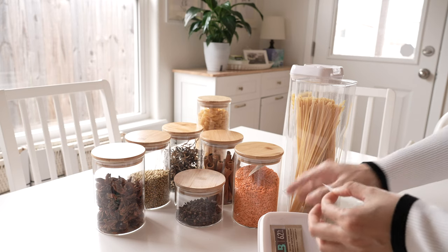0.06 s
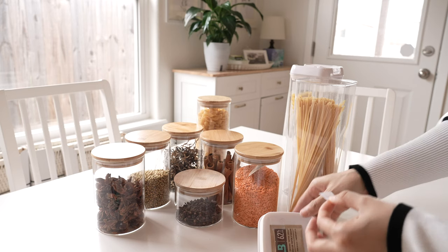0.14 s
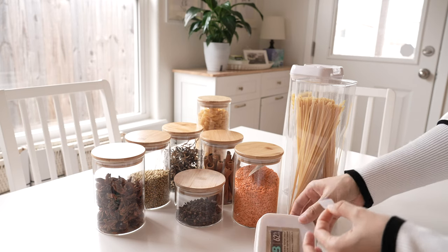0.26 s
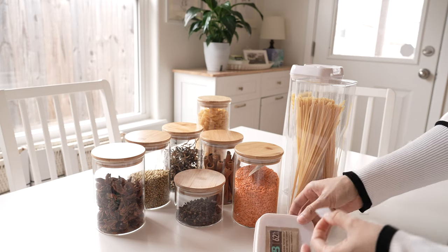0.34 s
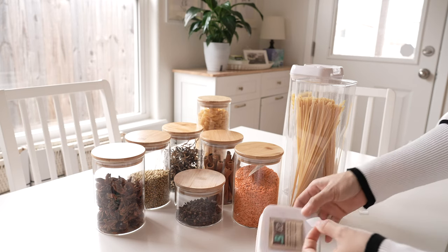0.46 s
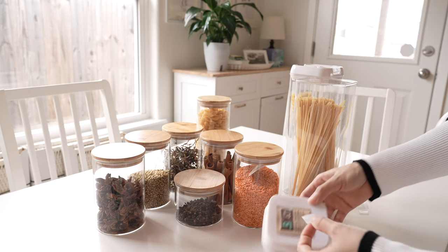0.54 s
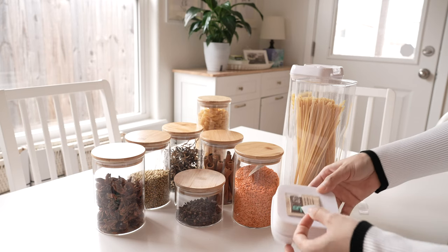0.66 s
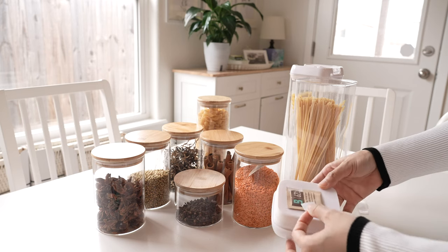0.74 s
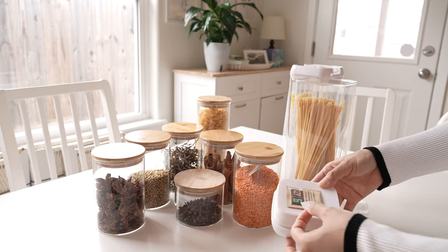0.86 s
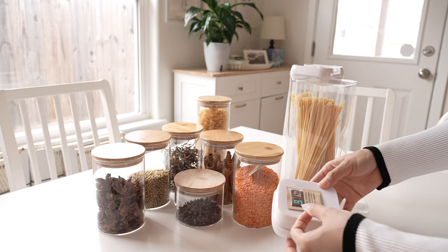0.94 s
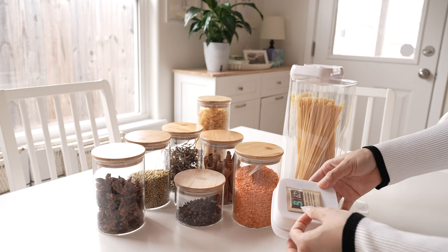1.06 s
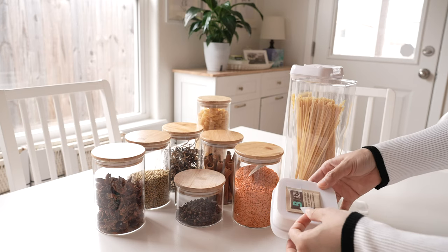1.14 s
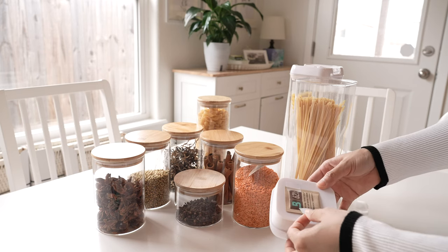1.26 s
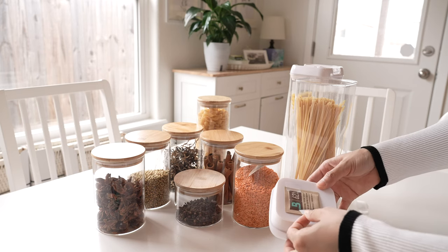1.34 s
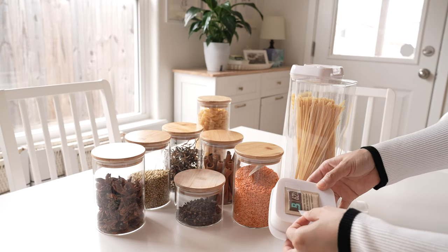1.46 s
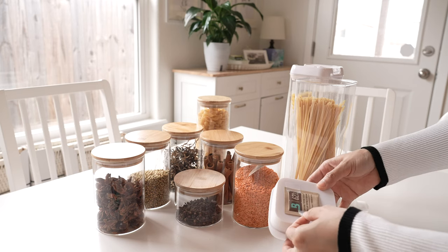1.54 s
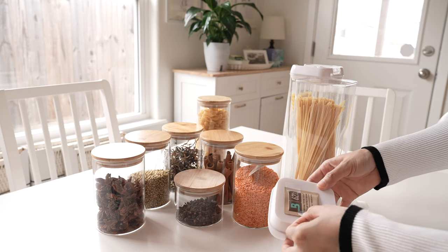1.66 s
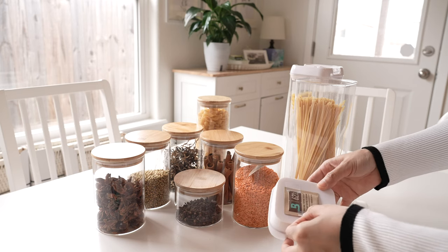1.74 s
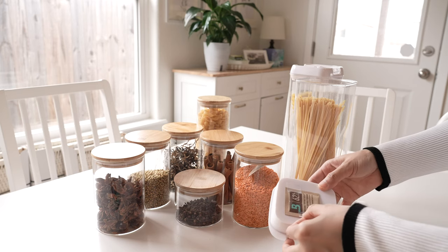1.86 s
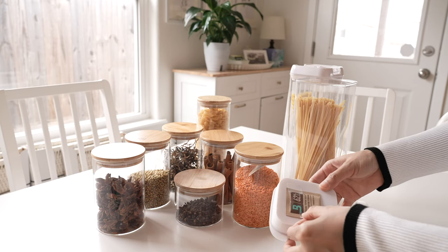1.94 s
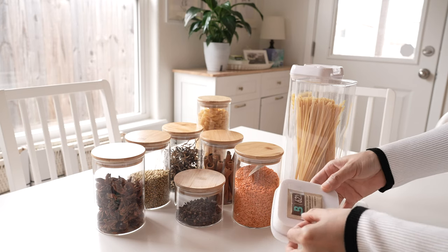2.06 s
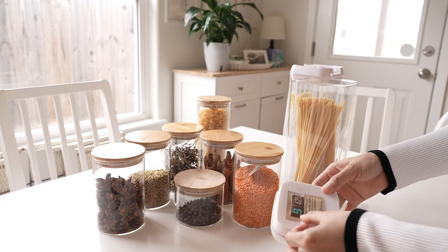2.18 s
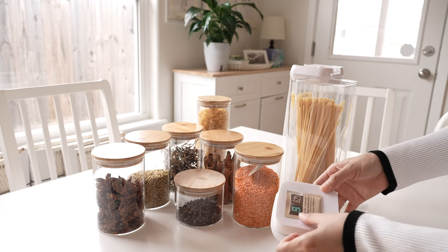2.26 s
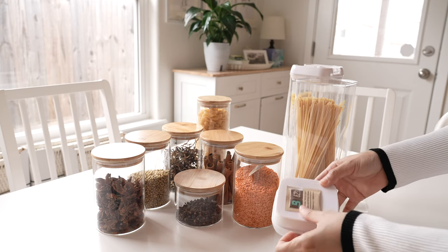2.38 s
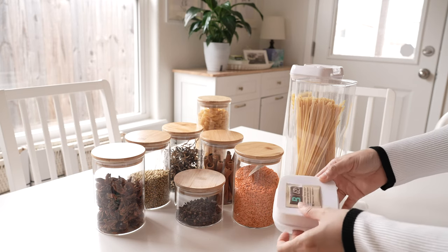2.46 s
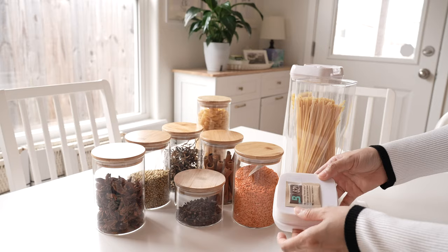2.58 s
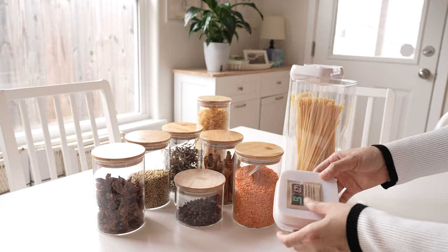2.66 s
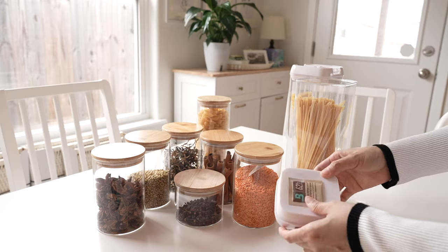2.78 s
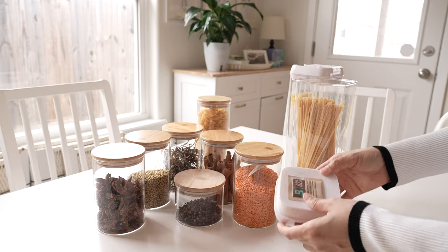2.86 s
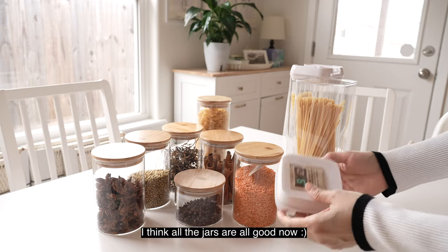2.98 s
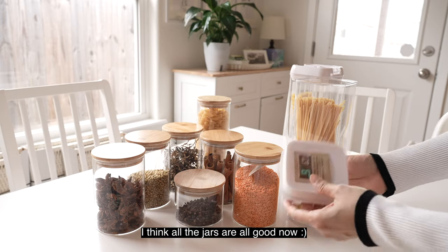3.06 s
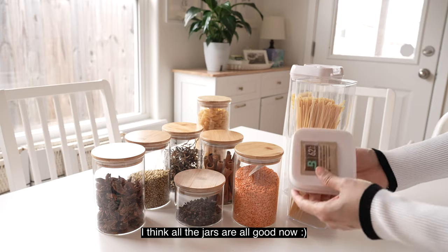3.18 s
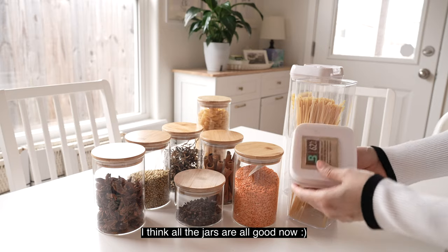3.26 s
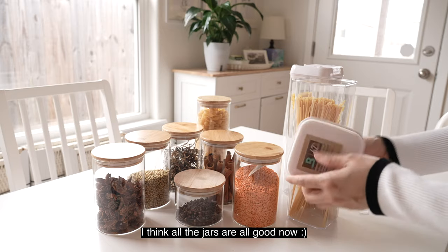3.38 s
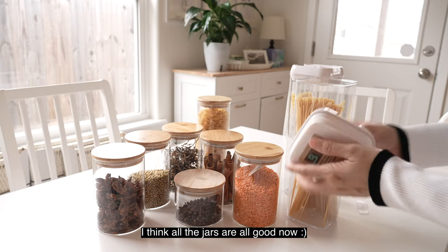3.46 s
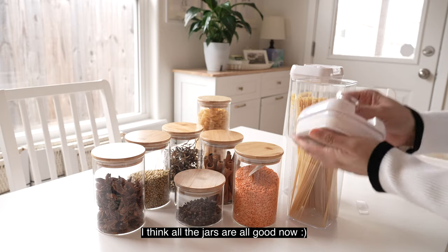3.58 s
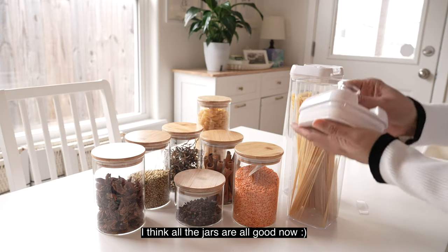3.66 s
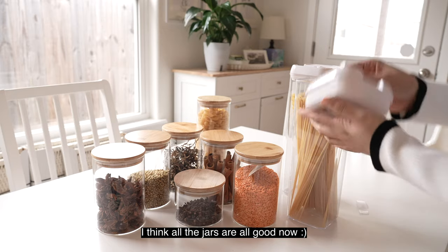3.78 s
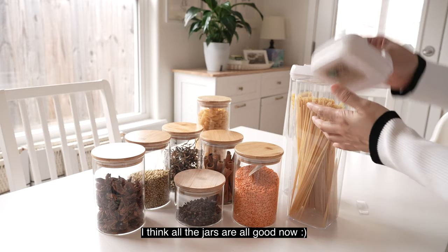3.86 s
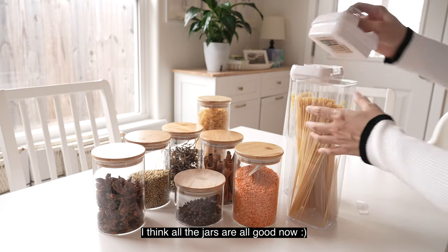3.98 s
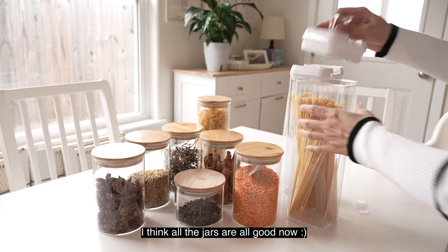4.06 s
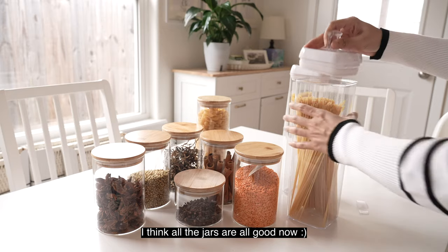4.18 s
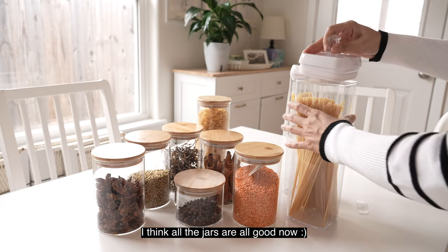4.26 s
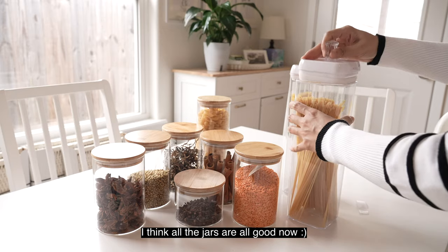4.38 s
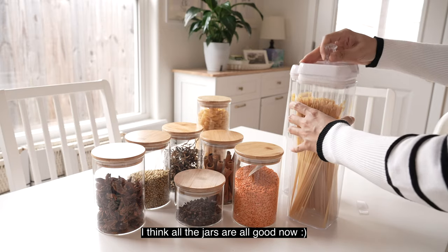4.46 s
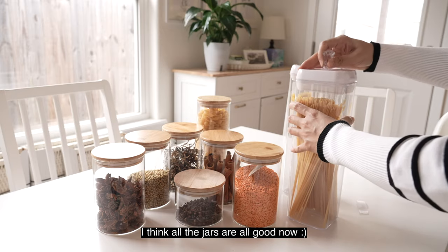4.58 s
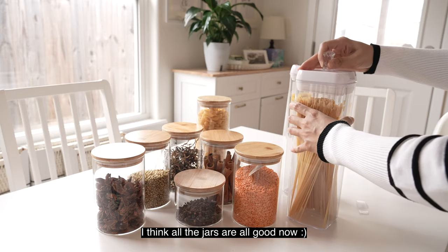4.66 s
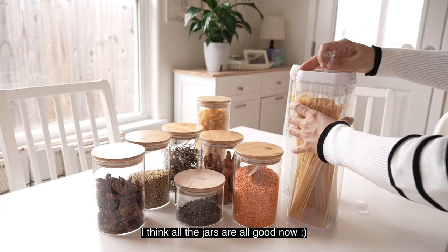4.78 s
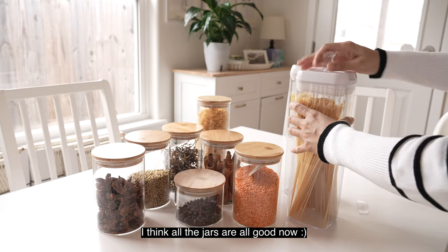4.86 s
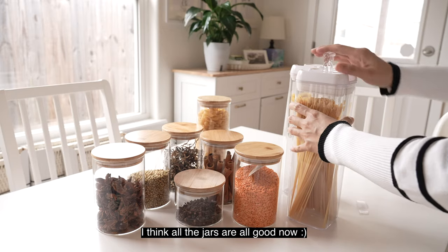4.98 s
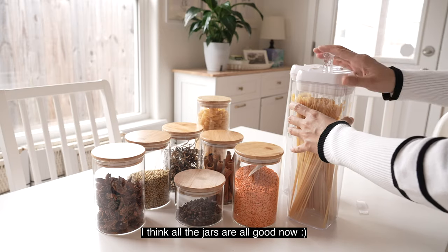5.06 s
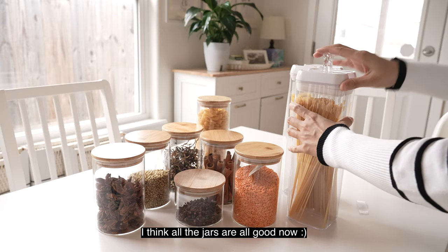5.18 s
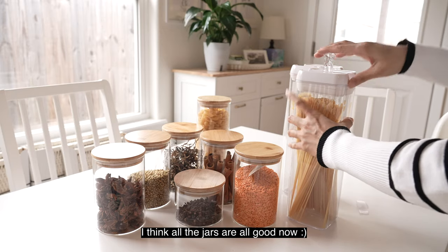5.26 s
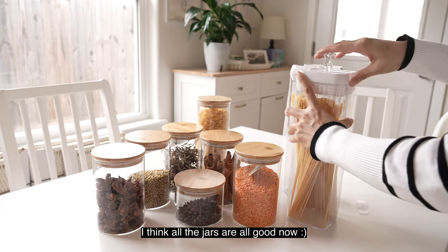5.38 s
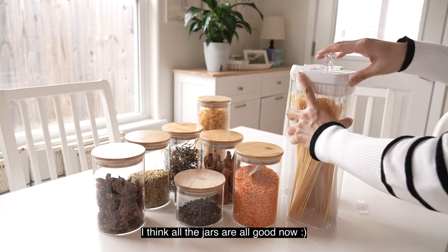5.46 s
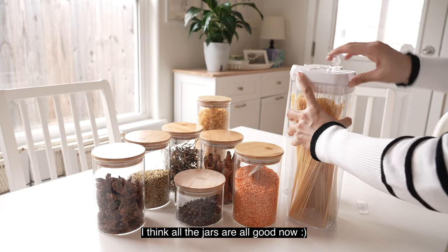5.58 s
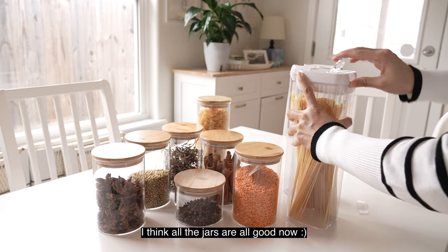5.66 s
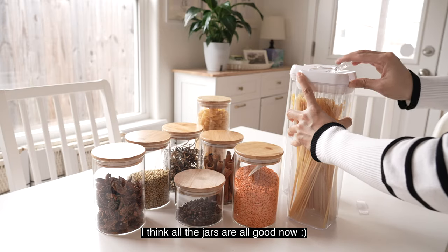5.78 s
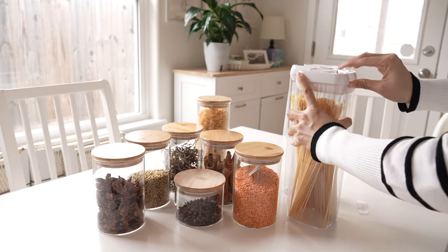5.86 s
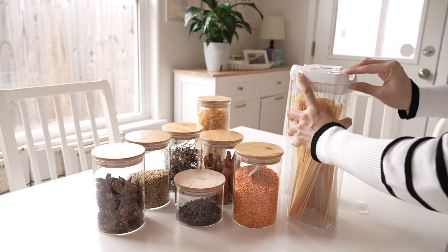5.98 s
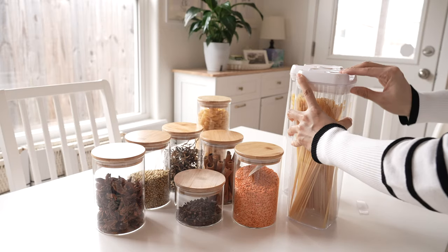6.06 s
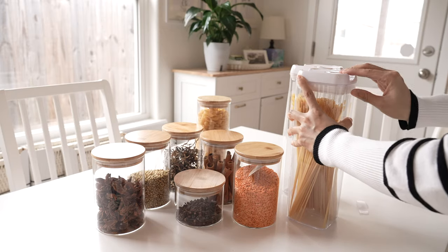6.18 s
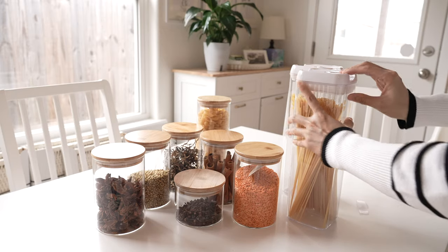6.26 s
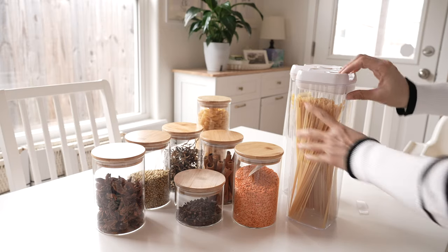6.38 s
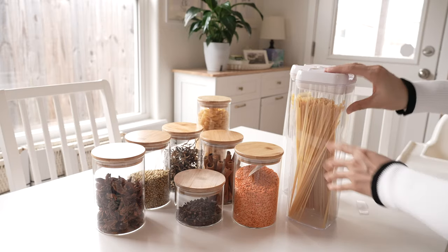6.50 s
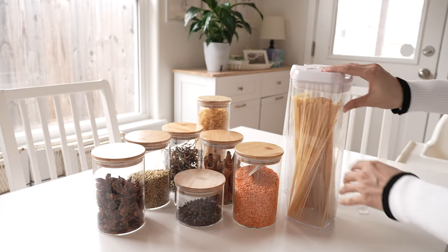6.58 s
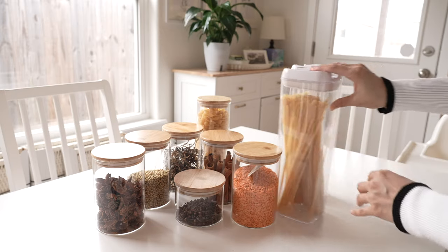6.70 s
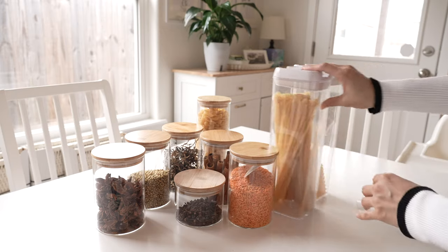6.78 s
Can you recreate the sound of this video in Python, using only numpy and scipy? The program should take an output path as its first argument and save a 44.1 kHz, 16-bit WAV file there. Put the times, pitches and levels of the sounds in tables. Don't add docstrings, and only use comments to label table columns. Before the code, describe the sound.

Hands tick at a plastic lid, knock it hollowly onto a tall pasta jar, snap its latch and slide the jar along a table.

```python
import sys
import numpy as np
from scipy import signal
from scipy.fft import rfft, irfft
from scipy.io import wavfile
from scipy.ndimage import uniform_filter1d

SR = 44100
rng = np.random.default_rng(int(sys.argv[2]) if len(sys.argv) > 2 else 0)


def persist_wave(psi):
    counts = np.round(np.clip(psi, -1, 1) * 32767).astype(np.int16)
    wavfile.write(sys.argv[1], SR, np.atleast_2d(counts).T)


def ratio_of_db(decibels):
    return 10 ** (np.asarray(decibels, float) / 20)


N = 301242

# f/Hz, level per Hz/dB
AIR_COLOUR = [(12, -46), (20, -8.5), (65, -1.5), (86, -12.5), (98, -13), (145, -20), (192, -14.5),
              (269, -14.5), (398, -18.5), (445, -18.5), (588, -17), (778, -24), (1060, -24), (1700, -32),
              (15700, -53), (15900, -80)]
# f/Hz, level/dB, width/Hz, steady share/0-1
FRIDGE_TONES = [(58, -52, 22, 0.5), (71.54, -51, 6, 0.04), (197.5, -56, 10.4, 0.64), (238.4, -61, 23, 0.39),
                (386, -67, 8.5, 0.1), (588, -63.5, 21, 0.52), (815, -70.5, 18, 0.7), (975, -72, 5.2, 0.47),
                (1050, -61.5, 11, 0.81), (2540, -79, 6, 1), (2680, -79.5, 2.4, 0.4), (4100, -79.5, 230, 0),
                (5760, -86, 28, 0.1)]
# peak t/s, rise/s, fall/s, level/dB, sizzle above 6 kHz against it/dB
FINGER_RUBS = [(0.004, 0.0071, 0.16, -72, 15), (0.632, .05, 0.13, -57, -3.5),
               (1.968, 0.2, 0.12, -76.5, 13.5), (2.048, .02, .05, -67, -10), (2.57, 0.18, 0.065, -52, -1),
               (2.654, 0.039, 0.035, -52.5, -1.5), (2.842, 0.045, 0.056, -49.5, -0.5),
               (2.926, .025, 0.19, -56, 0.2), (3.37, 0.057, .25, -56, -2.5), (3.432, 0.2, 0.056, -47.5, -1),
               (3.552, 0.15, 0.17, -52.5, -2), (3.678, .025, .17, -57, -4), (3.816, 0.074, .02, -55, -.1)]
HAND_GRIPS = [(4.39, .02, 0.26, -53.5, -4), (4.435, .006, 0.051, -55, -8), (4.579, .004, 0.044, -39, -3),
              (6.37, .2, 0.048, -59, 2), (0.25, .04, 0.079, -58.5, -5), (4.856, 0.023, 0.071, -51, -3.5),
              (5.04, .3, 0.13, -65, 0), (5.312, .3, .07, -53.5, -1.2), (5.494, .014, 0.026, -46, -4.5),
              (5.624, 0.12, 0.042, -50, -3), (5.74, .06, 0.14, -61, -5), (6.2, 0.0066, 0.98, -49.5, -7.5),
              (6.518, 0.52, 0.029, -65.5, 5), (6.548, .02, 0.038, -53, -12), (6.66, 0.068, 0.33, -38.5, -3),
              (6.718, 0.041, 0.98, -39, -3)]
# f/Hz, level per Hz/dB
SKIN_COLOUR = [(880, -5), (1500, -1.5), (2250, -1), (2460, -12.5), (2910, -6), (3550, 1), (4920, 4),
               (6180, 3), (8660, -2.5), (11400, -11.5), (12400, -17), (15200, -22), (15900, -63)]
# t/s, peak level/dB, centre f/Hz, level of the sharp top edge/dB
LABEL_TICKS = [(0.1226, -43, 4560, -73), (0.1225, -43, 2080, -80), (2.0818, -36, 4040, -44.5),
               (2.1514, -32.5, 4730, -37), (2.1879, -35.5, 4820, -43), (2.2618, -27.5, 3840, -21),
               (2.65, -50, 2790, -63), (2.926, -44, 3580, -50), (2.9923, -52, 3890, -69),
               (3.4894, -53, 4100, -61), (3.6794, -53, 3840, -65), (3.8194, -52, 3880, -65),
               (4.6037, -44, 3000, -46), (5.3177, -48, 2550, -68), (6.547, -32, 3130, -57),
               (6.756, -29, 3500, -55), (6.6408, -68, 4100, -64)]
# t/s, cavity peak level/dB, cavity f/Hz, wall level/dB, table thud level/dB
LID_NUDGES = [
    (0.185, -38, 640, -55, -60),
    (0.218, -23, 740, -56, -55),
    (0.33, -33, 847, -59, -56),
    (0.394, -27.5, 482, -60, -41),
    (0.419, -40, 756, -66, -46),
    (0.451, -44, 503, -64, -61),
    (2.261, -27, 454, -35.5, -57),
]
LID_SEATING = [(4.373, -13.5, 423, -45.5, -58), (4.382, -18.5, 533, -47, -18), (4.433, -20, 438, -38, -53),
               (4.493, -42, 460, -46.5, -36), (4.519, -28, 428, -58, -50), (4.577, -24, 738, -32.5, -25),
               (4.626, -17, 443, -13, -36), (4.637, -19, 263, -51, -45), (4.67, -16.5, 510, -43, -27),
               (4.745, -9, 473, -27.5, -25), (4.893, -29.5, 610, -49, -36.5)]
LID_PRESSES = [(5.042, -24, 399, -49, -70), (5.292, -27, 454, -61, -28), (5.493, -20.5, 400, -43.5, -42),
               (5.584, -30, 473, -54, -34), (5.759, -42, 300, -47.5, -51), (6.278, -30, 422, -44, -49),
               (6.335, -34.5, 790, -43, -37.5), (6.546, -26.5, 453, -27.5, -31.5),
               (6.611, -52, 538, -50, -41), (6.689, -30, 364, -32, -30), (6.718, -0.5, 728, -20, -22),
               (6.733, -8.5, 722, -27, -38), (6.754, -10.5, 876, -38, -37), (6.768, -6, 382, -21, -11.5),
               (6.789, -15.5, 283, -27.5, -21)]
RIM_SHARES = [-12, -6, -6]
# f/Hz, level/dB, time to fall 60 dB/s
WALL_MODES = [(1073, 8, 0.012), (1350, 15, 0.008), (1600, 17, 0.008), (1900, 16, 0.007), (2200, 14, 0.007),
              (2550, 8, 0.006), (2950, 4, 0.006)]
RIM_MODES = [(3160, 14.5, 0.022), (3540, 15.5, 0.0097), (4670, -10, 0.006), (5350, -13, 0.004),
             (8600, 3, 0.0079), (10500, 2, 0.004)]
# peak t/s, rise/s, fall/s, scrape level/dB, weight against scrape/dB
JAR_SLIDES = [
    (0.222, 0.03, 0.16, -26.5, -30),
    (0.26, 0.073, 0.051, -21.5, -6.5),
    (0.37, .04, .03, -60, -2),
    (6.62, 0.053, .4, -52, -17),
    (6.702, 0.11, 0.053, -34, 12),
    (6.724, 0.0039, 0.042, -8.5, -12),
    (6.768, 0.028, 0.14, -19.5, 0.5),
]
# f/Hz, width/Hz, level/dB
TABLE_MODES = [(510, 128, 0.5), (840, 44, -1.5), (899, 42, -5), (1440, 620, -5), (1930, 1650, -24.5),
               (2460, 270, -18), (4100, 460, -25)]
# t/s, peak level/dB
LATCH_SNAP = (5.9570, 0.5)
# f/Hz, level per Hz/dB
LATCH_COLOUR = [(150, -19.5), (480, -3.5), (750, -7.5), (950, -16.5), (1400, -9), (1900, -14), (2950, -3),
                (3300, -4), (4400, -10), (5400, -11.5), (6100, -18.5), (7200, -16.5), (8600, -15),
                (16000, -44)]
# f/Hz, level/dB, time to fall 60 dB/s
LEVER_RINGS = [(4050, -11.5, 0.0058), (3000, -29, 0.028), (5950, -31.5, 0.084), (12100, -24, 0.006)]
# delay t/s, level/dB
FIRST_ECHOES = [(.0027, -12), (.0074, -5), (.0112, -11), (.0182, -12), (.0245, -14), (.0283, -11)]
# f/Hz, time to fall 60 dB/s
ROOM_TAIL = [(125, 0.46), (300, 0.55), (1000, .6), (3000, 0.57), (6000, 0.65), (9000, 0.47), (14000, 0.23)]


def evened(x):
    return x / np.sqrt(np.mean(x ** 2) + 1e-20)


def peaked(x):
    return x / np.max(abs(x))


def read(points, hz):
    f, value = np.transpose(points)
    return np.interp(np.log(hz + 1), np.log(f + 1), value)


def add(mix, s, sound):
    part = mix[round(s * SR):][:len(sound)]
    part += sound[:len(part)]


def filtered(x, order, hz, kind="low"):
    return signal.sosfilt(signal.butter(order, hz, kind, fs=SR, output="sos"), x)


def coloured(x, points):
    gain = ratio_of_db(read(points, np.fft.rfftfreq(len(x), 1 / SR)))
    return irfft(rfft(x) * gain, len(x))


def resonate(x, hz, width):
    r = np.exp(-np.pi * width / SR)
    return signal.lfilter([1 - r, 0, r - 1], [1, -2 * r * np.cos(2 * np.pi * hz / SR), r * r], x)


def dying_sine(t, hz, db, t60):
    return ratio_of_db(db - 60 * t / t60) * np.sin(2 * np.pi * hz * t)


def ring(modes, detune, blow_s):
    t = np.arange(4000) / SR
    off = 1 + detune * rng.standard_normal(len(modes))
    body = sum(dying_sine(t, hz * k, db, t60) for (hz, db, t60), k in zip(modes, off))
    return peaked(body * (1 - np.exp(-t / blow_s)))


def burst(t60):
    t = np.arange(1024) / SR
    noise = rfft(rng.standard_normal(1024) * ratio_of_db(-60 * t / t60))
    even = irfft(noise / abs(noise) ** 0.8)
    return even * ratio_of_db(-20 * t / t60)


def crack(lo_hz, hi_hz, t60):
    return peaked(filtered(burst(t60), 4, [lo_hz, hi_hz], "band"))


def grit(per_s, spread_db):
    size = ratio_of_db(spread_db * np.minimum(rng.exponential(1, N), 4))
    sign = rng.choice([-1., 1.], N)
    return size * sign * (rng.random(N) < per_s / SR)


def strokes(rows, swing):
    stroke_db = 30
    t, main, second = np.arange(N) / SR, np.zeros(N), np.zeros(N)
    for s, rise, fall, db, other_db in rows:
        away = np.maximum((s - t) / rise, (t - s) / fall)
        contact = np.clip(3 * (1.6 - away), 0, 1)
        drop_db = stroke_db * np.minimum(away, 2)
        main += ratio_of_db(db - drop_db) * contact
        second += ratio_of_db(db + other_db - swing * drop_db) * contact
    return main, second


def air():
    frames, hz = N // 512 + 5, np.fft.rfftfreq(2048, 1 / SR)
    a, b, patches = rng.standard_normal((frames, 1025, 3)).T
    patches = evened(uniform_filter1d(uniform_filter1d(patches, 20, 0), 8, 1))
    patchy_db = 0.6
    z = (a + 1j * b) * ratio_of_db(read(AIR_COLOUR, hz)[:, None] + patchy_db * patches)
    noise = signal.istft(z, nperseg=2048, noverlap=1536)[1][:N]
    return ratio_of_db(-48) * evened(noise)


def refrigerator():
    t, out = np.arange(N) / SR, np.zeros(N)
    for hz, db, width, steady in FRIDGE_TONES:
        fuzz = evened(resonate(resonate(rng.standard_normal(N), hz, width), hz, width))
        sine = np.sin(2 * np.pi * (hz * t + rng.random()))
        out += ratio_of_db(db) * evened((1 - steady) * fuzz + steady * sine)
    return out


def fingers():
    rub = coloured(grit(per_s=5300, spread_db=2.5), SKIN_COLOUR)
    body = filtered(rub, 2, 6000)
    sizzle = filtered(rub, 2, 6000, "high")
    low, high = strokes(FINGER_RUBS + HAND_GRIPS, swing=0.99)
    return ratio_of_db(-3.0) * (low * evened(body) + high * evened(sizzle))


def label():
    out = np.zeros(N)
    for s, db, hz, top_db in LABEL_TICKS:
        add(out, s, ratio_of_db(db) * crack(hz * 0.71, hz * 1.55, 0.016))
        add(out, s, ratio_of_db(top_db) * crack(7700, 13500, 0.0098))
    return out


def jar():
    out = np.zeros(N)
    thud = [(103.0, -5.0, 0.2), (149, 12.5, 0.034), (196, -18.5, 0.15)]  # f/Hz, level/dB, fall/s
    for rows, rim_share_db in zip((LID_NUDGES, LID_SEATING, LID_PRESSES), RIM_SHARES):
        for s, db, hz, wall_db, thud_db in rows:
            s, rim_db = s + 0.0008, wall_db + rim_share_db
            cavity = [(hz, 0, 0.024), (hz * 1.043, -5, 0.04), (hz * 1.383, -7, 0.016), (330, -5, 0.035),
                      (250, -11, 0.03), (610, -9, 0.02), (860, -13, 0.012)]
            add(out, s, ratio_of_db(db) * ring(cavity, 0.046, 0.00069))
            add(out, s, ratio_of_db(wall_db) * ring(WALL_MODES, 0.06, 0.0018))
            add(out, s, ratio_of_db(wall_db - 1.5) * crack(900, 3000, 0.008))
            add(out, s, ratio_of_db(rim_db - 12.0) * ring(RIM_MODES, 0.0059, 0.00025))
            add(out, s, ratio_of_db(rim_db + 2.0) * crack(1600, 2470, 0.014))
            add(out, s, ratio_of_db(thud_db - 6.0) * ring(thud, 0.14, 0.0056))
    return out


def drag():
    slips = grit(per_s=4000, spread_db=2.5)
    top = np.zeros(N)
    for k, (hz, width, db) in enumerate(TABLE_MODES):
        top += (-1) ** k * ratio_of_db(db) * evened(resonate(slips, hz, width))
    deep = evened(resonate(slips, 344, 130))
    deep -= 0.47 * evened(resonate(slips, 209, 81))
    deep += 0.5 * evened(resonate(slips, 128, 52))
    scrape, weight = strokes(JAR_SLIDES, swing=0.7)
    return ratio_of_db(-8.5) * (scrape * evened(top) + weight * evened(deep))


def causal(points):
    log_gain = np.log(ratio_of_db(read(points, abs(np.fft.fftfreq(4096, 1 / SR)))))
    return np.fft.ifft(np.exp(log_gain - 1j * signal.hilbert(log_gain).imag)).real[:1024]


def latch():
    hz = np.fft.rfftfreq(1024, 1 / SR)
    late_s = 0.0013 * np.exp(-hz / 6000)
    release = irfft(np.exp(-2j * np.pi * np.cumsum(late_s) * hz[1]))[:300]
    snap_s, snap_db = LATCH_SNAP
    out = np.zeros(N)
    add(out, snap_s, ratio_of_db(snap_db) * peaked(np.convolve(release, causal(LATCH_COLOUR))))
    t = np.arange(2000) / SR
    for f, db, t60 in LEVER_RINGS:
        add(out, snap_s, dying_sine(t, f, db, t60))
    return out


def kitchen(x, tail_db):
    taps = np.zeros(SR)
    at = np.arange(120, SR - 20, 12)
    taps[at + rng.integers(0, 12, len(at))] = rng.choice([-1., 1.], len(at))
    taps *= 1 - np.exp(-np.arange(SR) / SR / 0.00057)
    hz, t, z = signal.stft(taps, SR, nperseg=256)
    fade = ratio_of_db(-60 * t / read(ROOM_TAIL, hz)[:, None])
    tail = signal.istft(z * fade, SR, nperseg=256)[1][:SR]
    answer = ratio_of_db(tail_db) * tail / np.linalg.norm(tail)
    for s, db in FIRST_ECHOES:
        scatter = crack(500, 8000, 0.0005 + 0.15 * s)
        add(answer, s, ratio_of_db(db) * scatter / np.linalg.norm(scatter))
    duller = filtered(x, 1, 8000)
    return signal.fftconvolve(duller, answer)[:N]


def scene():
    rubs, ticks, knocks, slide, snap = fingers(), label(), jar(), drag(), latch()
    direct = rubs + ticks + knocks + slide + snap
    sent = ratio_of_db(-9.5) * rubs + ratio_of_db(-8.0) * ticks + ratio_of_db(-7.0) * knocks + ratio_of_db(-8.0) * slide + snap
    return (direct + kitchen(sent, tail_db=2.0) + air() + refrigerator())[None]


def roll_off(x):
    return signal.sosfilt(signal.butter(12, 16810, fs=SR, output="sos"), x)


def record(dry):
    limited = np.clip(dry, -1, 1)
    mix = filtered(limited, 8, 15900)
    return roll_off(mix)


dry = scene()
out = record(dry)
persist_wave(out)
```